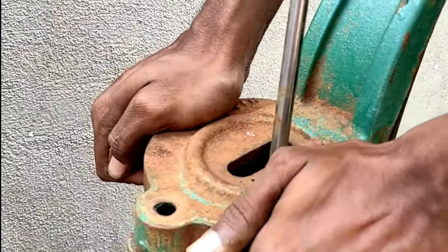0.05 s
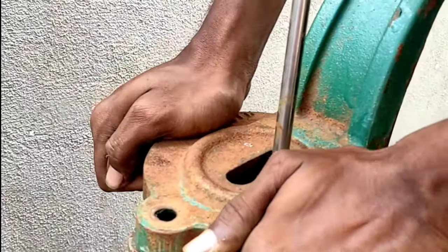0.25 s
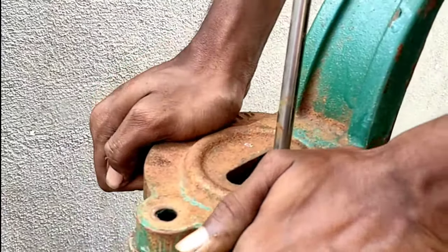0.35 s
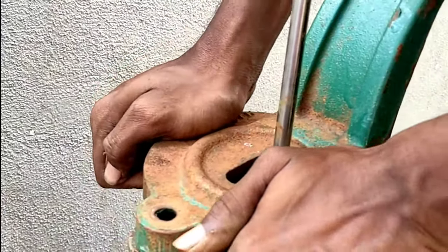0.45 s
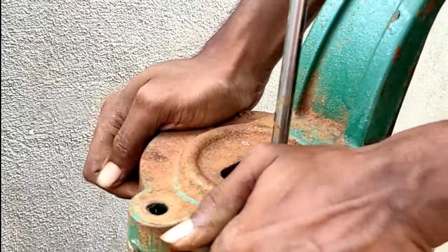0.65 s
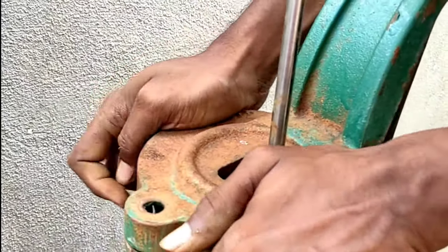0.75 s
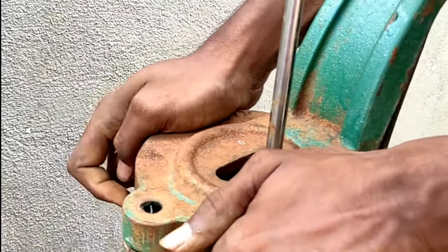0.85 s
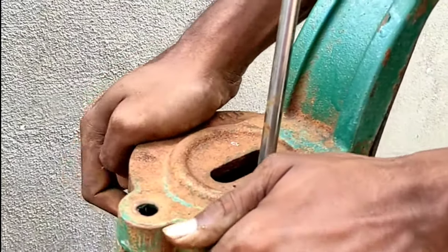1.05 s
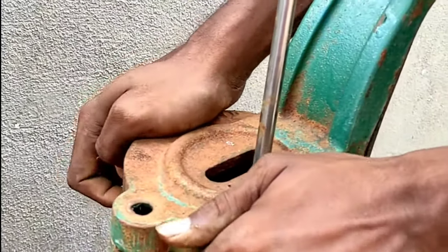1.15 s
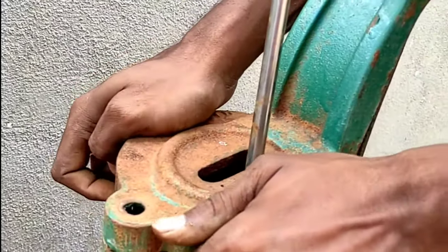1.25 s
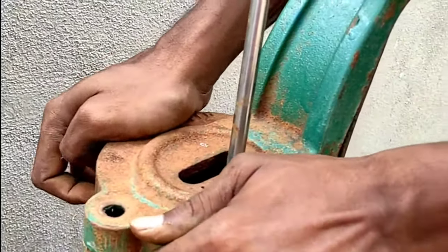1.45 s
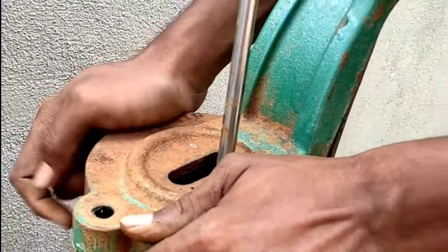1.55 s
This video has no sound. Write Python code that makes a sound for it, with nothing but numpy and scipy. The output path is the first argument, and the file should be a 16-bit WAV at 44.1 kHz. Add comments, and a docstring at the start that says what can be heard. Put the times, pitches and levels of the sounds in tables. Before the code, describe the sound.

A sharp metal clank rings out close to the microphone as a cast-iron pump cover slides and falls into place. Soft, hissy scraping of hands on rust follows, with a light knock, in still outdoor air.

```python
"""A cast-iron hand pump in a still yard, heard from close by on a small, bright stereo microphone.
The cover slides on its seat, snapping grit, then drops with a double clank that overloads
the microphone. A near wall throws the sound back as the cover rattles briefly. From about half
a second on, hands rub and scrape over the rusty iron, with a few dull knocks."""
import sys
import numpy as np
from scipy import signal
from scipy.fft import rfft, irfft
from scipy.io import wavfile
from scipy.ndimage import uniform_filter1d

SR = 44100
rng = np.random.default_rng(int(sys.argv[2]) if len(sys.argv) > 2 else 0)


def wrap_up_sound(samples):
    """Save the sound to the file named by the first command line argument, as 16-bit audio."""
    columns = np.atleast_2d(samples).T
    # keep every value between -1 and 1, then stretch to whole-number steps
    tamed = np.clip(columns, -1, 1)
    steps = np.round(tamed * 32767).astype(np.int16)
    wavfile.write(sys.argv[1], SR, steps)


N = 70560  # 1.6 s
TILT_FROM_HZ = 1500  # a blow's brightness acts above this


def amp(db):
    """Decibels to gain."""
    return 10 ** (np.asarray(db) / 20)


def unit(x):
    """Scales to rms 1."""
    return x / np.sqrt(np.mean(x ** 2) + 1e-20)


def at_hz(points, hz):
    """Reads a table on a log-frequency axis."""
    freqs, values = np.transpose(points)
    return np.interp(np.log(hz + 1), np.log(freqs + 1), values)


def sides(pan_db):
    """Left and right gains; pan is left minus right."""
    return amp(np.array([[.5], [-.5]]) * pan_db)


def add(mix, start, sound):
    """Mixes a sound in at start seconds."""
    part = mix[:, max(round(start * SR), 0):][:, :sound.shape[1]]
    part += sound[:, :part.shape[1]]


def fade(t, t60):
    """Exponential decay, 60 dB down at t60."""
    return np.exp(-np.log(1000) * t / t60)


def fade_bands(x, t60s):
    """Lets each band die at its own speed."""
    hz, t, bands = signal.stft(x, SR, nperseg=128)
    fall_db = -60 * t / at_hz(t60s, hz)[:, None]
    return signal.istft(bands * amp(fall_db), SR, nperseg=128)[1][:, :x.shape[1]]


# How alike the microphone's two ports hear: (frequency [Hz], coherence [0-1])
MIC_COHERENCE = [(60, 0.31), (280, 0.93), (640, 0.48), (1400, 0.041), (3000, 0.027), (7000, 0)]
def port_spectra(hz):
    """Left and right white-noise spectra, alike mainly in the low range."""
    left, other = rfft(rng.standard_normal((2, 2 * (len(hz) - 1))))
    same = at_hz(MIC_COHERENCE, hz)
    return np.array([left, same * left + np.sqrt(1 - same ** 2) * other])


# Balance at the microphone, mostly to the left: (frequency [Hz], pan [dB])
MIC_PAN = [(60, 6.5), (300, 12), (700, 10.5), (1300, 7), (2400, 7), (3300, 0.5), (5200, 1), (7200, -1.5),
           (8100, 5.5), (8900, 6.5), (11000, 3), (15000, -2)]
def mic_noise(colour, size, tilt_db=0):
    """Coloured noise as the two ports hear it, tilted by tilt_db per octave."""
    hz = np.fft.rfftfreq(size, 1 / SR)
    spectra = port_spectra(hz) * sides(at_hz(MIC_PAN, hz))
    colour_db = at_hz(colour, hz) + tilt_db * np.log2(np.maximum(hz, TILT_FROM_HZ))
    return unit(irfft(spectra * amp(colour_db), size))


def friction(colour, stroke, grain_db=0.96, grain_s=0.0013):
    """Grainy scraping noise that follows a stroke's level curve."""
    grain = unit(uniform_filter1d(rng.standard_normal(N), int(grain_s * SR)))
    level_db = np.interp(np.arange(N) / SR, *np.transpose(stroke))
    return amp(level_db) * unit(mic_noise(colour, N) * amp(grain_db * grain))


# Air all around the yard: (frequency [Hz], relative density [dB])
AIR_COLOUR = [(25, 6.5), (70, -4.5), (105, -12), (145, 2.5), (200, -6), (290, -1), (420, -6.5),
              (1100, -8.5), (2100, -9.5), (3200, -23.5), (5500, -21.5), (7800, -20), (9300, -18),
              (10200, -52), (15000, -60)]
def still_air(level_db=-47):
    """Faint, steady outdoor noise."""
    return amp(level_db) * mic_noise(AIR_COLOUR, N)


# The iron's dense modes, scraped or struck: (frequency [Hz], relative density [dB])
IRON_COLOUR = [(40, -12), (110, -14.5), (170, -11.5), (300, -5), (480, 5.5), (600, -5.5), (950, 0.5),
               (1900, 0), (2350, 6), (2750, -9.5), (3400, -2.5), (4500, -8.5), (5250, -9.5), (5700, -12.5),
               (6800, 2), (7500, -11.5), (8600, 1.5), (9400, -12.5), (10200, -38), (15000, -31)]
# The cover moving on its seat: (time [s], level [dB])
SLIDE_STROKE = [(0.0, -70.5), (0.15, -54.5), (0.184, -49), (0.212, -39), (0.225, -25), (0.235, -60),
                (0.27, -40), (0.33, -49.5), (0.42, -58), (0.68, -64), (0.714, -43.5), (0.79, -50),
                (0.86, -54.5), (0.93, -57)]
def sliding():
    """The cover grinds as it drops, settles and is nudged again."""
    return friction(IRON_COLOUR, SLIDE_STROKE)


# Grit under the cover, left of centre: (time [s], level [dB])
GRIT_SNAPS = [(0.035, -47), (0.0508, -29.5), (0.0542, -49), (0.064, -37), (1.264, -36)]
# One snap: (frequency [Hz], relative density [dB])
GRIT_COLOUR = [(1000, -34), (5500, -14.5), (7000, 0.5), (8300, 3), (9800, -20), (11500, -34), (15000, -31)]
def grit(rise_s=0.00021, t60_s=.01, pan_db=9):
    """Grains of rust break with tiny bright snaps."""
    out, t = np.zeros((2, N)), np.arange(2048) / SR
    envelope = np.minimum(t / rise_s, 1) * fade(t, t60_s)
    for start, db in GRIT_SNAPS:
        add(out, start, amp(db) * sides(pan_db) * envelope * mic_noise(GRIT_COLOUR, len(t)))
    return out


# Knocks and booms, left of centre: (time [s], level [dB], pitch [Hz], rise [s], t60 [s])
KNOCKS_AND_BOOMS = [(0.1156, -27.5, 323, 0.0031, .12), (0.13, -39.5, 167, 0.005, .15),
                    (0.164, -33, 404, 0.024, 0.11), (0.188, -31.5, 306.5, 0.011, 0.66),
                    (0.2208, 2, 414, 0.0041, 0.017), (0.2252, -21, 311.4, 0.002, 0.14),
                    (0.2345, -7, 289.2, 0.0026, 0.064), (0.239, -15.5, 237, 0.0059, 0.097),
                    (0.256, -19.5, 160.3, 0.008, 0.075), (0.307, -36, 173, 0.011, 0.1157),
                    (0.7015, -30, 295.6, 0.0015, 0.22), (0.724, -33, 185, 0.041, 0.17),
                    (0.886, -37.5, 260, 0.0018, 0.038), (1.129, -38.5, 256.4, .04, 0.36)]
def thuds(pan_db=9.5):
    """Dull knocks, some followed by a low boom echoing from the surroundings."""
    out, t = np.zeros((2, N)), np.arange(SR // 2) / SR
    for start, db, hz, rise, t60 in KNOCKS_AND_BOOMS:
        envelope = amp(db) * np.minimum(t / rise, 1) * fade(t, t60)
        add(out, start, -sides(pan_db) * envelope * np.sin(2 * np.pi * hz * t))
    return out


# Iron striking iron, close to the microphone:
# (time [s], ring [dB], crash [dB], crack [dB], brightness [dB/octave], rise [s])
IRON_BLOWS = [(0.2245, -13.5, -9, -11, 2.5, 0.001), (0.2329, -0.5, -12.5, -3.5, 0, 0.0002),
              (0.2357, -48, -9.5, -20, -1, 0.00077), (0.2807, -23.5, -25, -70, 1, 0.0033),
              (0.351, -36, -39, -75, 0, 0.0033), (0.6993, -24, -32.5, -70, 0, 0.0024),
              (0.886, -54, -51, -75, -2, 0.0026)]
# Clear modes of the casting and its rod: (frequency [Hz], relative level [dB], t60 [s], pan [dB])
IRON_MODES = [(768, -16, .085, 4), (945, -17, .08, 9), (1050, -20, .08, 3), (1145, -20, .1, 12),
              (1510, -19, .09, 0), (1738, -19, .11, 5), (2232, -14, .1, 17), (2325, -22, .14, 6),
              (2972, -21, .07, -1), (3345, -12, .06, 3), (3948, -18, .08, -6), (4858, -26, .13, -10),
              (6028, -30, .18, -2), (6890, -17, .1, -1), (7149, -22, .09, -11), (8105, -23, .12, 12),
              (8560, -16, .08, 1), (8635, -20, .09, 4), (9288, -32, .11, 13)]
def ringing(max_lag_rad=1.7):
    """Each blow rings the iron's modes; the higher ones reach the two ports out of step."""
    out, t = np.zeros((2, N)), np.arange(SR // 2) / SR
    lags = max_lag_rad * rng.uniform(-1, 1, len(IRON_MODES))
    for start, ring_db, _, _, tilt_db, rise in IRON_BLOWS:
        for (hz, db, t60, pan_db), lag in zip(IRON_MODES, lags):
            phase = np.array([[0], [lag * (1 - at_hz(MIC_COHERENCE, hz))]])
            bright_db = tilt_db * np.log2(max(hz / TILT_FROM_HZ, 1))
            envelope = amp(ring_db + db + bright_db) * (1 - np.exp(-t / rise)) * fade(t, t60)
            add(out, start, sides(pan_db) * envelope * np.sin(2 * np.pi * hz * t + phase))
    return out


# Decay of the dense modes: (frequency [Hz], t60 [s])
CRASH_DECAY = [(100, 0.12), (1000, 0.075), (4000, 0.071), (8500, 0.063), (12000, 0.054)]
# The crack of contact: (frequency [Hz], relative density [dB])
CRACK_COLOUR = [(300, -16), (3000, 1), (6000, -2), (8600, -1), (10000, -21), (15000, -31)]
def crashes(crack_t60_s=.018):
    """Each blow starts with a sharp crack and a crash of dense, quickly dying modes."""
    out, t = np.zeros((2, N)), np.arange(SR // 2) / SR
    for start, _, crash_db, crack_db, tilt_db, rise in IRON_BLOWS:
        crash = amp(crash_db) * fade_bands(mic_noise(IRON_COLOUR, len(t), tilt_db), CRASH_DECAY)
        crack = amp(crack_db) * mic_noise(CRACK_COLOUR, len(t)) * fade(t, crack_t60_s)
        add(out, start, (crash + crack) * (1 - np.exp(-t / rise)))
    return out


# Decay of the yard: (frequency [Hz], t60 [s])
YARD_DECAY = [(150, 0.66), (1000, .36), (4000, 0.22), (9000, 0.21), (13000, 0.18)]
# What comes back to the microphone: (frequency [Hz], gain [dB])
YARD_COLOUR = [(60, -5), (160, -13), (350, -24.5), (1000, -14), (4000, -16.5), (8500, -13.5), (12000, -26)]
def yard(direct, build_s=0.021):
    """Short diffuse reflections build up from the near wall and the ground."""
    size = SR // 2
    hz, t = np.fft.rfftfreq(size, 1 / SR), np.arange(size) / SR
    spectra = port_spectra(hz)
    white_norm = np.linalg.norm(fade_bands(irfft(spectra, size), YARD_DECAY)[0])
    tail = fade_bands(irfft(spectra * amp(at_hz(YARD_COLOUR, hz)), size), YARD_DECAY)
    tail *= np.minimum(t / build_s, 1) ** 2
    return signal.fftconvolve(direct, tail / white_norm, axes=1)[:, :N]


# Hands on the pump, close and dry, faint until 0.45 s: (time [s], relative level [dB])
HAND_STROKES = [(0.0, -52.5), (0.05, -52.5), (0.114, -58), (0.19, -49.5), (0.3, -58), (0.419, -58),
                (0.453, -34), (0.512, -34), (0.64, -39), (0.705, -37), (0.755, -53), (0.85, -49),
                (0.875, -61), (0.947, -54.5), (0.97, -38.5), (1.045, -43.5), (1.059, -36.5), (1.075, -40.5),
                (1.11, -37), (1.198, -46.5), (1.235, -39), (1.3, -50), (1.345, -48), (1.41, -38),
                (1.462, -31.5), (1.528, -35.5), (1.6, -48)]
# Skin on rust: (frequency [Hz], relative density [dB])
HAND_COLOUR = [(100, -70), (900, -20), (2200, -13), (3500, -19), (5000, -12), (6200, -13), (7100, -0.5),
               (8100, 2), (9000, -6.5), (9800, -16), (11000, -23), (14300, -20.5), (15500, -34)]
def rubbing(ripple_db=3, ripple_hz=90, ring_db=15.5):
    """Hands scrape the rust, and the hiss rings the casting's modes."""
    hz = np.fft.rfftfreq(N, 1 / SR)
    # a fine random ripple in the spectrum makes the hiss slightly tonal
    ripple = uniform_filter1d(rng.standard_normal((2, len(hz))), int(ripple_hz * N / SR), axis=1)
    ripple_gain = unit(amp(ripple_db * unit(ripple)))
    modes = sum(amp(db + ring_db) / (1 + 1j * (hz - mode_hz) * t60)
                for mode_hz, db, t60, _ in IRON_MODES)
    hiss = friction(HAND_COLOUR, HAND_STROKES)
    return irfft(rfft(hiss) * ripple_gain * (1 + modes), N)


def scene():
    """At the microphone: the cover, its reflections, the hands and the air."""
    ring = ringing()
    contacts = crashes() + thuds() + grit() + sliding()
    reflections = yard(contacts + amp(-5) * ring)
    return ring + contacts + reflections + rubbing() + still_air()


def record(dry, cutoff_hz=15600):
    """The clank overloads the microphone into soft clipping; the top treble is then cut."""
    clipped = dry / (1 + dry ** 8) ** (1 / 8)
    lowpass = signal.firwin(255, cutoff_hz, window=("kaiser", 7), fs=SR)
    return signal.oaconvolve(clipped, lowpass[None], "same")


dry = scene()
out = record(dry)
wrap_up_sound(out)
```